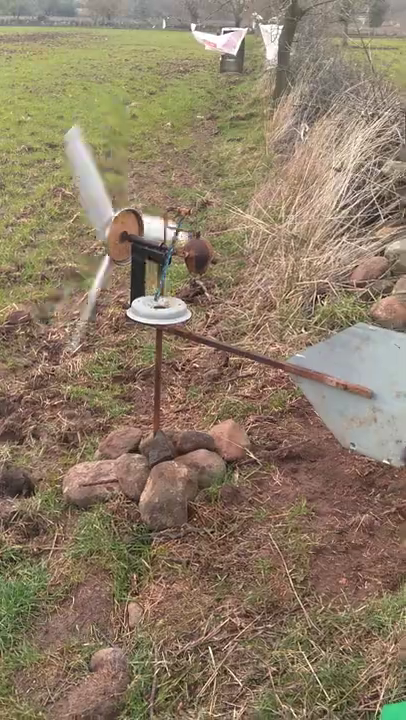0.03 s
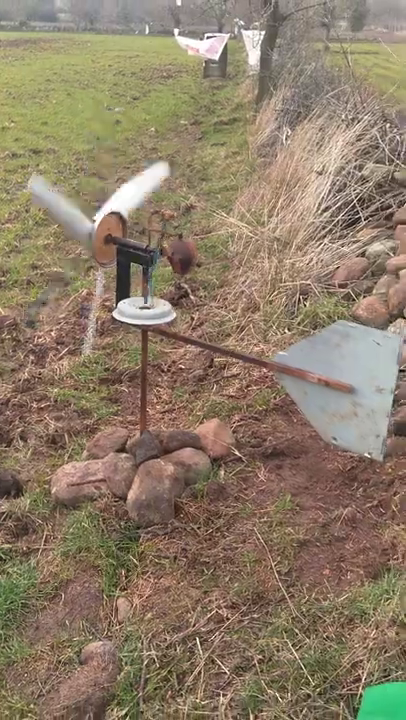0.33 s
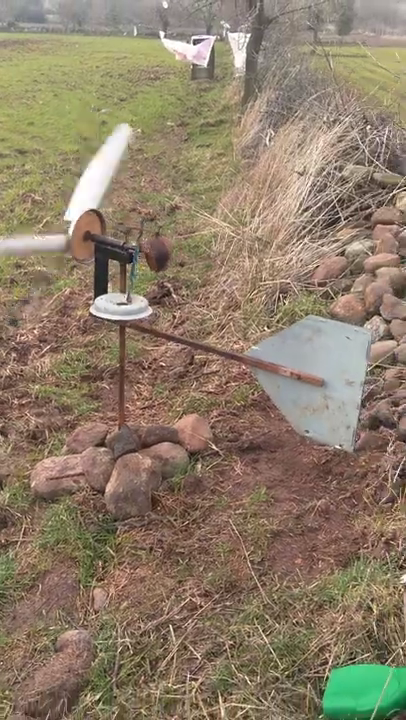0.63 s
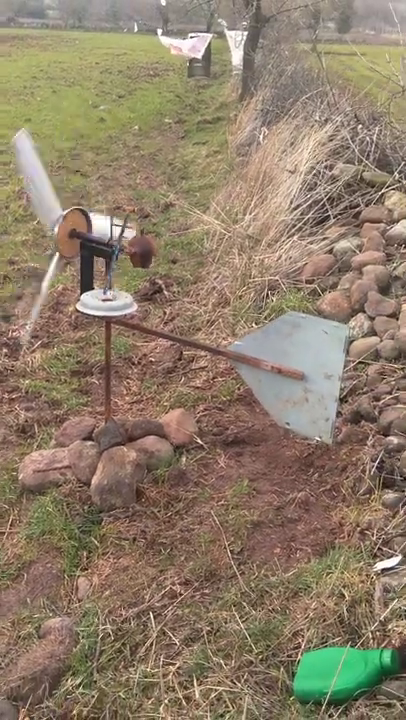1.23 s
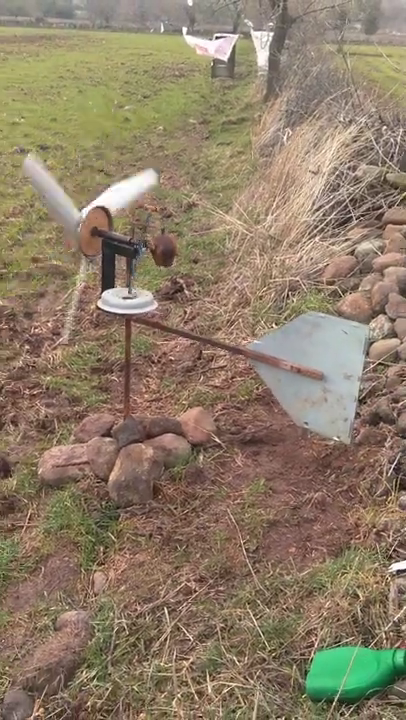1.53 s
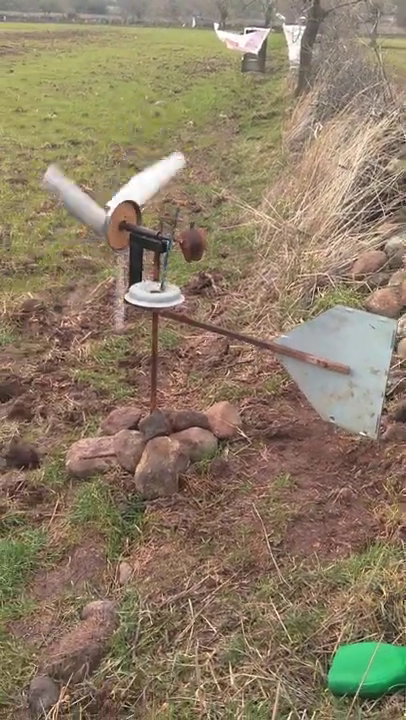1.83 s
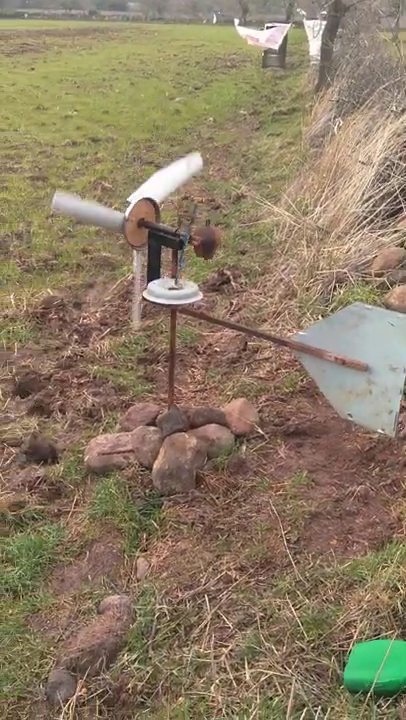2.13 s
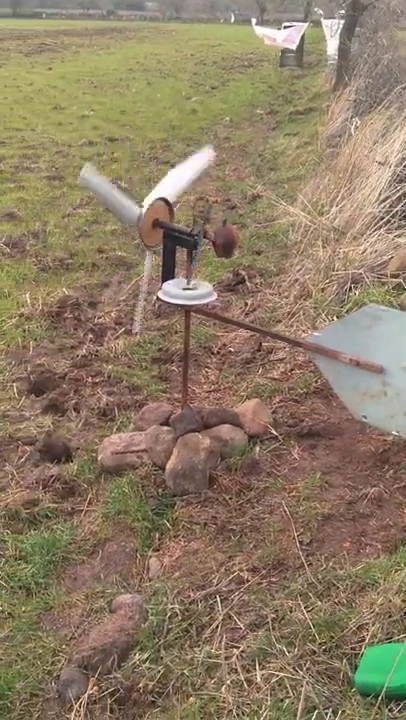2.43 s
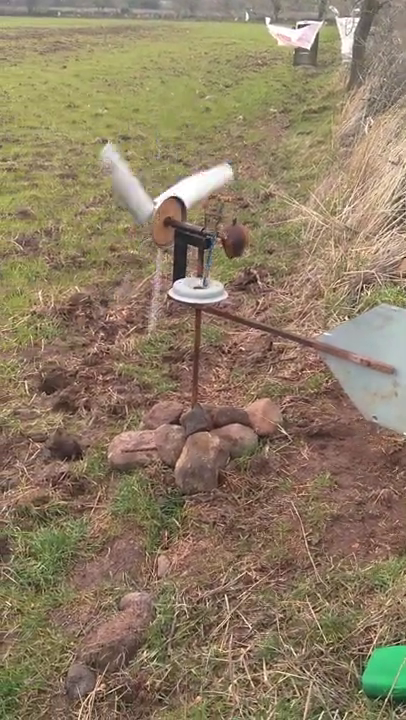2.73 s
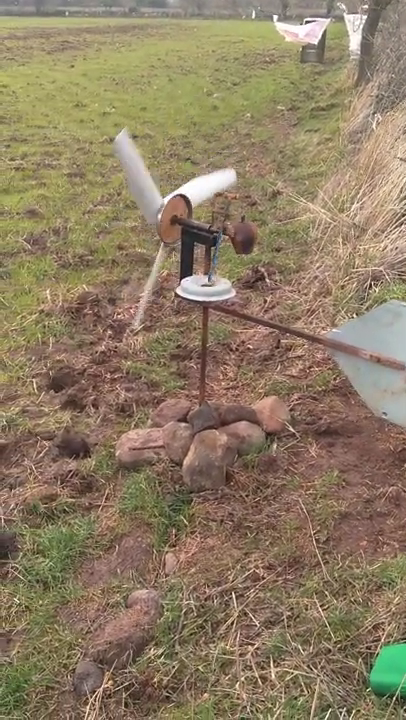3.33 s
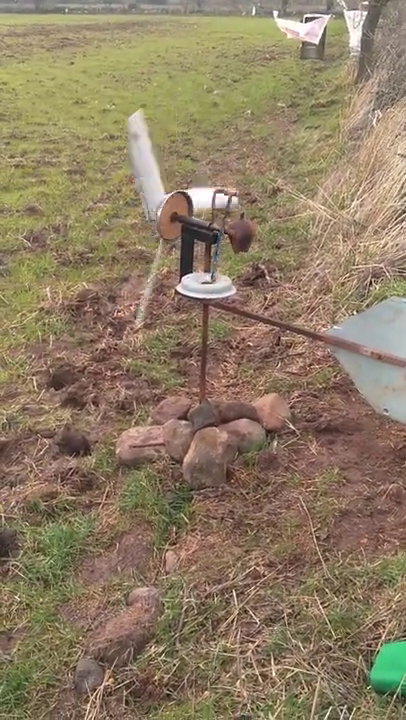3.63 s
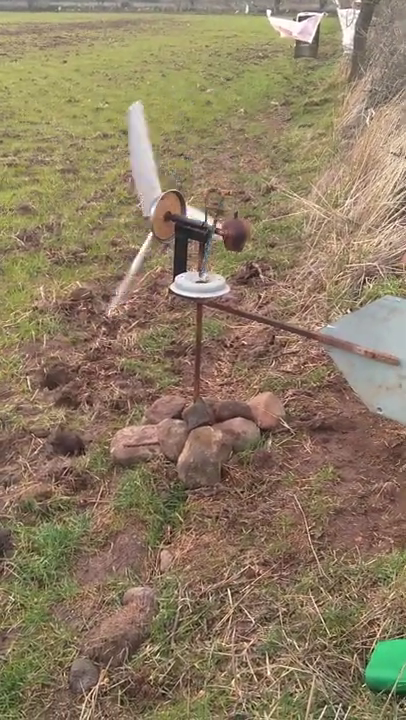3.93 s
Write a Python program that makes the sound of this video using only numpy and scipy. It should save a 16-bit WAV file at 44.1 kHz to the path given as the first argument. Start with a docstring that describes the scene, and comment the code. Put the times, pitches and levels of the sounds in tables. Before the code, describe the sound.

A small windmill clanks like a cowbell, rattling between strikes, in light wind.

```python
"""A small home-made windmill clanks in an open field. Light wind buffets the microphone throughout.
On each turn, about every 0.43 s, a cam lifts a metal clapper with a soft knock and drops it on a
bell-like iron body, which clanks and rings. The clapper rebounds against its arm; the loose linkage
then chatters and ticks until the next turn, and now and then a rod snaps back with a bright ting."""
import sys
import numpy as np
from scipy import signal
from scipy.fft import rfft, irfft
from scipy.io import wavfile

SR = 44100
rng = np.random.default_rng(int(sys.argv[2]) if len(sys.argv) > 2 else 0)


def wrap_up_sound(samples):
    """Save the sound to the file named by the first command line argument, as 16-bit audio."""
    columns = np.atleast_2d(samples).T
    # keep every value between -1 and 1, then stretch to whole-number steps
    tamed = np.clip(columns, -1, 1)
    steps = np.round(tamed * 32767).astype(np.int16)
    wavfile.write(sys.argv[1], SR, steps)


N = 176400

# soft clapper touches, on lift or rebound: t/s, low ring level/dB, high ring level/dB
KNOCKS = [(0.097, -46, -46), (0.204, -36, -31.5), (0.481, -35.5, -40.5), (.597, -30.5, -54),
          (.654, -41, -38), (0.879, -31, -41), (.996, -30, -34), (1.055, -33, -40.5), (1.256, -43, -36.5),
          (1.295, -38, -38), (1.403, -30.5, -32), (1.46, -34.5, -32), (1.674, -32, -37), (2.1, -32, -40),
          (2.236, -41, -34.5), (2.28, -31, -36), (2.521, -33.5, -36), (2.695, -34.5, -38.5),
          (2.942, -35, -39.5), (3.2, -32.5, -41), (3.412, -34, -37.5), (3.66, -36, -43.5),
          (3.88, -35.5, -41)]
# clapper falls: t/s, clank level/dB, low ring level/dB, high ring level/dB
STRIKES = [(0.161, -33, -36, -36), (0.5631, -25.5, -28, -35.5), (0.961, -25.5, -28, -29),
           (1.3637, -24, -28.5, -33.5), (1.7772, -28, -30, -34), (2.1976, -28, -28, -43.5),
           (2.6604, -27.5, -29.5, -44), (3.1111, -31, -30.5, -37.5), (3.5793, -28, -29, -33.5)]
# linkage rattles: t/s, level/dB, length/s
RATTLES = [(0.198, -37.5, 0.0067), (0.364, -39, 0.0059), (0.397, -36.5, 0.029), (0.591, -26, 0.01),
           (0.668, -35.5, 0.011), (0.734, -36.5, 0.033), (0.798, -34, 0.018), (0.993, -26, 0.0058),
           (1.054, -35, 0.021), (1.155, -37, 0.0029), (1.196, -37.5, 0.0093), (1.4, -24.5, 0.0094),
           (1.45, -40, 0.02), (1.565, -38, 0.013), (1.611, -40.5, 0.01), (1.815, -25, 0.013),
           (2.034, -37, 0.01), (2.237, -24.5, 0.018), (2.415, -42.5, 0.0087), (2.439, -41, 0.0072),
           (2.491, -36.5, 0.012), (2.693, -32, .025), (2.883, -35.5, 0.015), (2.951, -35, 0.014),
           (3.022, -50, 0.007), (3.154, -31.5, 0.024), (3.343, -38, 0.023), (3.412, -36, 0.017),
           (3.608, -32, 0.053), (3.812, -37, 0.017), (3.88, -36.5, 0.013), (3.954, -48.5, 0.0063)]
# dense linkage modes: f/Hz, relative density/dB
CHATTER_SPECTRUM = [(200, -8.5), (1900, -5.5), (3300, -0.5), (5200, 6.5), (5900, -3), (6900, 5),
                    (8100, -3.5), (10300, -7), (11200, -0.5), (13000, -11), (14100, 7), (14600, -81)]
# their decay: f/Hz, t60/s
CHATTER_T60 = [(500, 1), (3000, 0.22), (7000, 0.042), (14000, 0.099)]
# direction of the mechanism: f/Hz, left minus right/dB
PAN = [(700, -4.5), (3000, 1), (6300, 10.5), (10000, 1), (14000, -3)]
KNOCK_RISE_S, STRIKE_S, REBOUND_S = 0.0025, 0.004, 0.012


def amp(db):
    """Decibels to gain."""
    return 10 ** (np.asarray(db) / 20)


def unit(x):
    """Scale to rms 1."""
    return x / np.sqrt(np.mean(x ** 2) + 1e-20)


def read(points, hz):
    """Interpolate a table over log frequency."""
    f, value = np.transpose(points)
    return np.interp(np.log(hz + 1), np.log(f), value)


def sides(db):
    """Left and right gains for level differences."""
    return amp(np.outer([.5, -.5], db))


def add(mix, s, sound):
    """Mix a stereo sound in at time s."""
    part = mix[:, max(round(s * SR), 0):][:, :sound.shape[1]]
    part += sound[:, :part.shape[1]]


def noise(spectrum, size, coherence=0.38, peaky_db=0, lines=600, left_lag_s=0.00015):
    """Coloured stereo noise; peaky_db gathers the treble into narrow lines."""
    hz = np.fft.rfftfreq(size, 1 / SR)
    common, other = rfft(rng.standard_normal((2, size)))
    left = common * np.exp(-2j * np.pi * hz * left_lag_s)
    right = coherence * common + np.sqrt(1 - coherence ** 2) * other
    heights = np.minimum(rng.standard_normal(lines), 2)
    lines_db = peaky_db * np.interp(hz, np.linspace(0, SR / 2, lines), heights) * np.minimum(hz / 3240, 1)
    return unit(irfft(np.array([left, right]) * amp(read(spectrum, hz) + lines_db), size))


def wind(left_bias_db=5):
    """Wind on the microphone: lumpy rumble, higher flutter in gusts, faint hiss of the field."""
    # buffeting: f/Hz, relative density/dB
    rumble_spectrum = [(48, -2), (100, -10.5), (400, -38.5), (4000, -74)]
    # air hiss: f/Hz, relative density/dB
    air_spectrum = [(4000, 5), (9000, -12)]
    # gusts: t/s, 1/e half-width/s, rumble rise/dB
    gusts = [(0.4, 0.21, 6), (1.219, 0.024, 15.5), (3.096, 0.055, 8.5), (3.326, 0.072, 10.5),
             (3.774, 0.034, 9.5)]
    t = np.arange(N) / SR
    lump_db = 2.5 * unit(sum(np.sin(2 * np.pi * (hz * t + rng.random())) for hz in np.geomspace(1, 14, 20)))
    gust_db = sum(db * np.exp(-((t - s) / width_s) ** 2) for s, width_s, db in gusts)
    rumble = amp(-35 + lump_db + gust_db) * noise(rumble_spectrum, N, coherence=0.23)
    band = signal.lfilter(*signal.butter(2, [100, 300], "band", fs=SR), rng.standard_normal((2, N)))
    flutter = amp(-65.5 + 2 * gust_db) * unit(band)
    hiss = amp(-55.5) * noise(air_spectrum, N, coherence=0.53)
    return sides(left_bias_db) * (rumble + flutter) + hiss


def bell(strike_rise_s=0.0017, catch_s=0.004, left_lag_rad=1.35):
    """Iron body: each clapper touch damps the old ring and starts a new one."""
    # low body modes: f/Hz, level/dB, t60/s
    low_modes = [(499.8, -4, 0.27), (517.7, 1, 0.14), (541.1, 2.5, 0.5), (632.2, -16.5, 2.45)]
    # high body modes: f/Hz, level/dB, t60/s
    high_modes = [(1417.5, -14, 2), (1465.5, 0, 1.3), (2542, -12, .9), (2599, -18, 1.1), (2723, -19, .8),
                  (3710, -16, .5)]
    touches = [(s, low_db, high_db, strike_rise_s) for s, _, low_db, high_db in STRIKES]
    touches = sorted(touches + [(*row, KNOCK_RISE_S) for row in KNOCKS])
    ends_s = [row[0] for row in touches[1:]] + [N / SR]
    out = np.zeros((2, N))
    for (s, low_db, high_db, rise_s), end_s in zip(touches, ends_s):
        t = np.arange(0, end_s - s + 10 * catch_s, 1 / SR)
        ring = np.zeros((2, len(t)))
        for modes, level_db in (low_modes, low_db), (high_modes, high_db):
            for hz, db, t60_s in modes:
                phase = 2 * np.pi * (hz * t + rng.random()) - np.array([[left_lag_rad], [0]])
                ring += amp(level_db + db - 60 * t / t60_s) * np.sin(phase)
        damping = np.exp(-np.maximum(t - (end_s - s), 0) / catch_s)
        add(out, s, np.sqrt(2) * ring * (1 - np.exp(-t / rise_s)) * damping)
    return out


def dense_ring(spectrum, decay, size=24576, scatter_t60_s=0.19, crack_s=0.0038):
    """Struck metal: a crack, close modes dying by band, faint scatter from the surroundings."""
    hz, t, bands = signal.stft(noise(spectrum, size, peaky_db=6), SR, nperseg=256)
    fade = amp(-60 * t / read(decay, hz)[:, None]) + amp(-8.5 - 60 * t / scatter_t60_s)
    ring = signal.istft(bands * fade * sides(read(PAN, hz))[:, :, None], SR)[1]
    accent = 1 + amp(-7.5) * np.exp(-np.arange(ring.shape[1]) / SR / crack_s)
    return ring * np.linspace(1, 0, ring.shape[1]) * accent


def bounces(length_s, size=4096, rate_hz=600, spread_db=5):
    """First contact, then a quick run of uneven bounces; energy 1."""
    chance, hardness, sign = rng.random(size), rng.exponential(1, size), rng.choice([-1, 1], size)
    hits = (chance < rate_hz / SR) * (np.arange(size) / SR < length_s)
    clicks = hits * sign * amp(spread_db * np.minimum(hardness, 2.5))
    clicks[0] = 2
    return clicks[None] / np.linalg.norm(clicks)


def contact(body, spectrum, decay, length_s, bands=48, colour_db=7):
    """Bounces excite the common body ring plus a ring coloured by the point of contact."""
    local = rfft(dense_ring(spectrum, decay))
    colour = np.interp(np.linspace(0, bands - 1, local.shape[1]), range(bands), rng.standard_normal(bands))
    local = irfft(local * unit(amp(colour_db * colour)), body.shape[1])
    burst = signal.fftconvolve(body + local * np.linspace(1, 0, local.shape[1]), bounces(length_s))
    return burst * np.linalg.norm(body) / np.linalg.norm(burst)


def clanks(edge_db=-13.5, bite_db=-9.5, thud_db=-10, thud_cutoff_hz=1490):
    """Impacts on iron and arm: hard strikes, rebounds, bite of the chatter, dull thuds of soft touches."""
    # dense iron modes: f/Hz, relative density/dB
    spectrum = [(350, -14), (520, -1.5), (850, -14), (1400, -0.5), (1800, -10), (2500, 3), (3200, 1.5),
                (4300, -16.5), (7000, -19), (8300, -37.5), (13600, -14), (15000, -41)]
    # their decay: f/Hz, t60/s
    decay = [(1400, 0.29), (3000, 0.012), (7000, 0.37), (14000, 0.015)]
    body, out = dense_ring(spectrum, decay), np.zeros((2, N))
    arm = rod_tone(hz=3203, t60_s=0.05)
    for s, db, _, _ in STRIKES:
        add(out, s, amp(db) * contact(body, spectrum, decay, STRIKE_S))
        add(out, s, amp(db + edge_db) * edge_crack())
        add(out, s, amp(db - 3.5) * arm)
    # clapper rebounds against its arm: t/s, level/dB
    rebounds = [(0.192, -45), (.589, -36), (0.987, -40), (1.399, -33), (1.813, -39), (2.234, -39),
                (2.697, -36), (3.205, -37), (3.601, -32.5)]
    for s, db in rebounds:
        add(out, s, amp(db) * contact(body, spectrum, decay, REBOUND_S))
        add(out, s, amp(db + 5) * arm)
    for s, db, length_s in RATTLES:
        add(out, s, amp(db + bite_db) * signal.fftconvolve(body, bounces(length_s / 2)))
    thud = signal.lfilter(*signal.butter(2, thud_cutoff_hz, fs=SR), body)
    thud *= 1 - np.exp(-np.arange(thud.shape[1]) / SR / KNOCK_RISE_S)
    for s, db, _ in KNOCKS:
        add(out, s, amp(db + thud_db) * thud)
    return out


def linkage(tick_db=-50):
    """Runs of tiny impacts excite frame and rods; each soft clapper touch adds a faint tick."""
    body, out = dense_ring(CHATTER_SPECTRUM, CHATTER_T60), np.zeros((2, N))
    ticks = [(s, tick_db, REBOUND_S) for s, _, _ in KNOCKS]
    for s, db, length_s in RATTLES + ticks:
        add(out, s, amp(db) * contact(body, CHATTER_SPECTRUM, CHATTER_T60, length_s))
        add(out, s, amp(db) * rods(length_s))
    return out


def rods(rise_s, spread_db=2, t60_at_1khz_s=0.33):
    """Clear rod modes build up and ring on, the high ones more briefly."""
    # linkage rod modes: f/Hz, level/dB
    rod_modes = [(886, -12), (1136, -5), (4330, -9), (4786, 2), (4910, -3), (5405, -5), (6638, -1),
                 (6880, -5), (14105, -13)]
    t = np.arange(SR // 2) / SR
    hz, db = np.transpose(rod_modes)
    t60_s = t60_at_1khz_s * (hz / 1000) ** -0.29
    modes = amp(db[:, None] - 60 * t / t60_s[:, None]) * np.exp(2j * np.pi * hz[:, None] * t)
    gains = sides(read(PAN, hz)) * amp(spread_db * rng.standard_normal(len(hz)))
    phasors = gains * np.exp(2j * np.pi * rng.random(gains.shape))
    return amp(-10.5) * np.minimum(t / rise_s, 1) * (phasors @ modes).real


def edge_crack(decay_s=0.0048):
    """Bright burst as the clapper's edge meets the iron."""
    t = np.arange(SR // 10) / SR
    return noise(CHATTER_SPECTRUM, len(t)) * np.exp(-t / decay_s)


def rod_tone(hz, t60_s):
    """One struck mode of a rod."""
    t = np.arange(SR // 2) / SR
    return sides(read(PAN, hz)) * amp(-60 * t / t60_s) * np.sin(2 * np.pi * hz * t)


def tings(snap_db=-3.5):
    """A loose rod snaps back: one clear tone above a sharp snap and the ring of the rods."""
    # rod snaps: t/s, level/dB
    snaps = [(.203, -28.5), (0.26, -31.5), (0.336, -33), (0.598, -27), (1.134, -35), (1.539, -38),
             (1.967, -35)]
    out = np.zeros((2, N))
    for s, db in snaps:
        add(out, s, amp(db) * rod_tone(hz=5380, t60_s=0.18))
        add(out, s, amp(db + snap_db) * dense_ring(CHATTER_SPECTRUM, CHATTER_T60))
        add(out, s, amp(db) * rods(STRIKE_S))
    return out


def scene():
    """Windmill plus wind, stereo."""
    return bell() + clanks() + linkage() + tings() + wind()


def record(dry, start_s=0.075, fade_s=0.018, cutoff_hz=14900):
    """Quick fade-in from silence, then low-pass."""
    fade_in = np.clip((np.arange(N) / SR - start_s) / fade_s, 0, 1)
    lowpass = signal.firwin(151, cutoff_hz, window=("kaiser", 7), fs=SR)
    return signal.oaconvolve(dry * fade_in, lowpass[None], "same")


dry = scene()
out = record(dry)
wrap_up_sound(out)
```